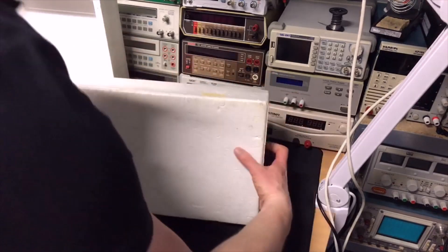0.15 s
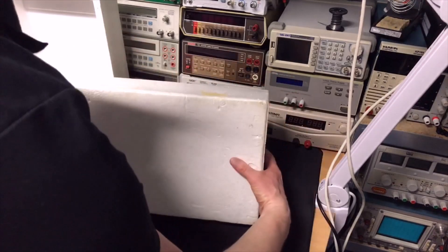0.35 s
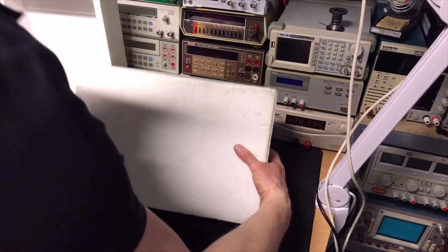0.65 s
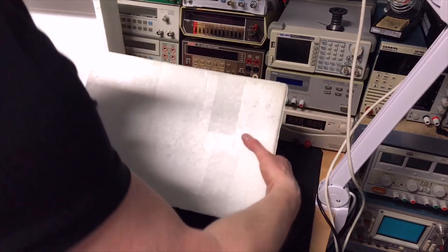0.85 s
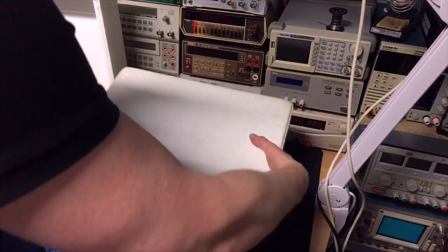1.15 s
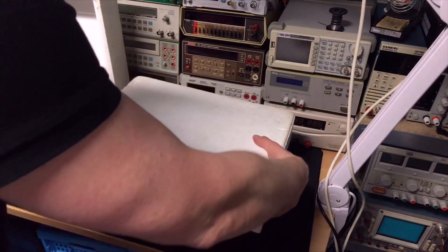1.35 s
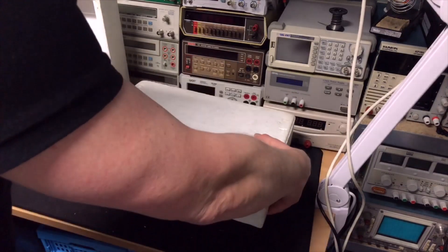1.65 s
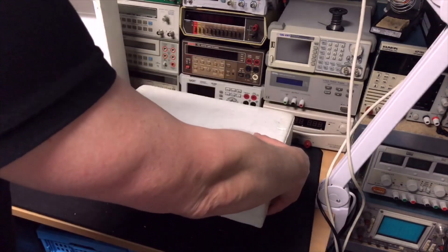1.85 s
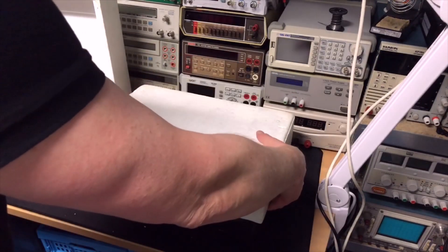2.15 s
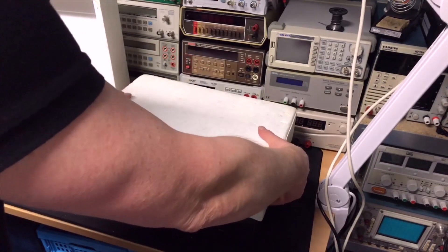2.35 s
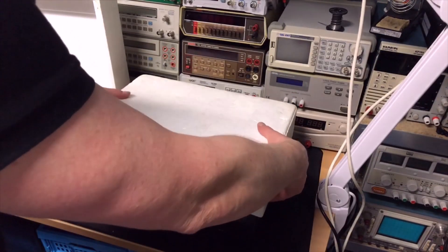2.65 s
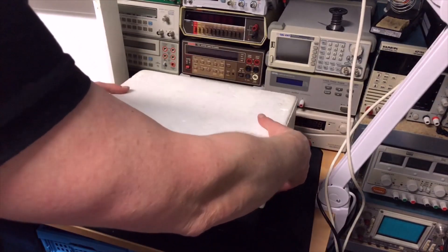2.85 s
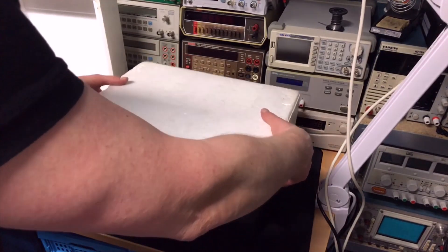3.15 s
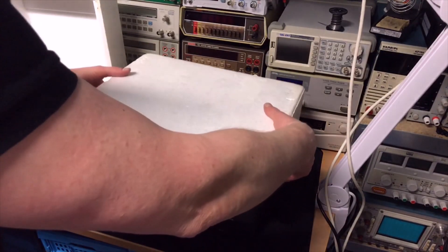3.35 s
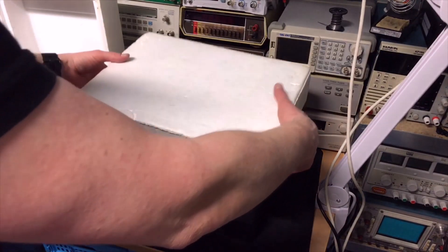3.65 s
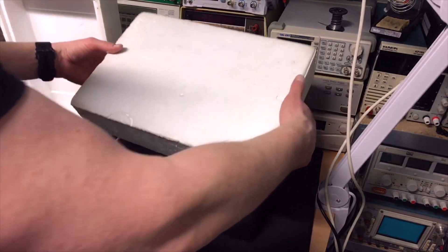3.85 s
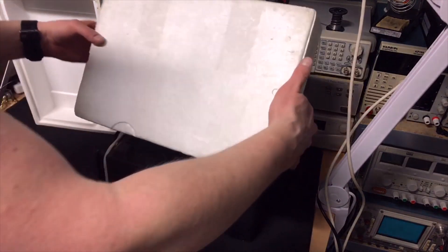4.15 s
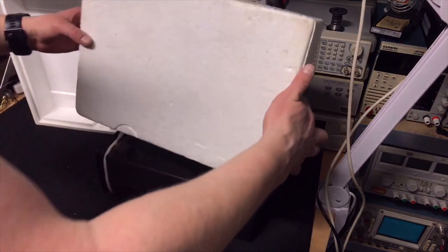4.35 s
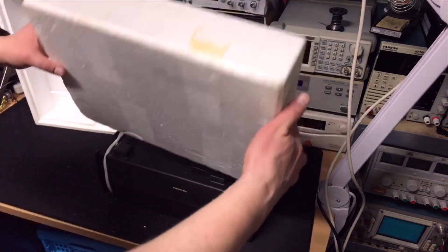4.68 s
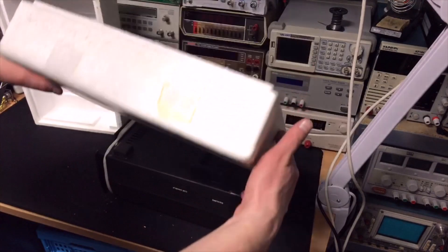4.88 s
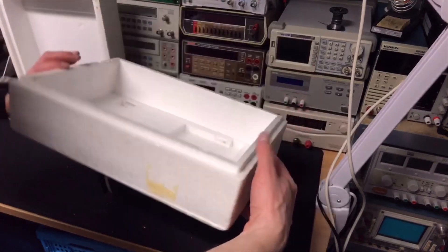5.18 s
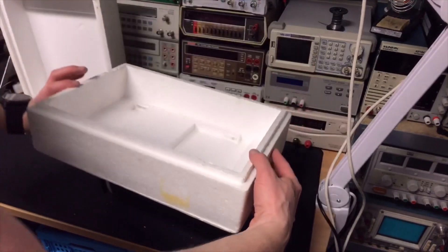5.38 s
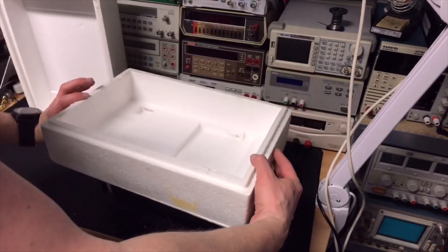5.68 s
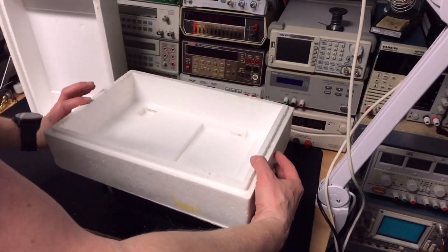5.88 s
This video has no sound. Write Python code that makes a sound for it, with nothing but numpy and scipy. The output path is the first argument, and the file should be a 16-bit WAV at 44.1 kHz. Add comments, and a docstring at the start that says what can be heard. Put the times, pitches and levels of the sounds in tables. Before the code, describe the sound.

Hands work a polystyrene foam shell off an equipment case in a quiet workshop. It opens with a loud burst of scraping and snapping, then scattered taps and soft hollow thumps. A longer run of squeaky rubbing follows as the foam sticks and slips. After a lull come lighter scrapes and squeaks, then a few knocks and a final rub. The microphone is close, with a very faint fan hum behind.

```python
"""Foam shell worked off an instrument case.

Hands loosen a foam packing shell in a quiet workshop, close to a phone. Foam beads stick and slip
in dense clicks that ring the shell, and at times squeak or snap. Grips and knocks tap it, its
hollow booms, fingers rustle on it, and a fan hums far off."""
import sys
import numpy as np
from scipy import signal
from scipy.fft import rfft, irfft
from scipy.io import wavfile
from scipy.ndimage import uniform_filter1d, map_coordinates

SR = 44100
rng = np.random.default_rng(int(sys.argv[2]) if len(sys.argv) > 2 else 0)


def file_out(sig):
    """Save sig as 16-bit WAV at sys.argv[1]."""
    # one column per channel
    cols = np.atleast_2d(sig).T
    # limit, then scale
    lim = np.clip(cols, -1, 1)
    pcm = np.round(lim * 32767).astype(np.int16)
    wavfile.write(sys.argv[1], SR, pcm)


N = 265482
TIME_S = np.arange(N) / SR


def undb(db):
    """Decibels to gain."""
    return 10 ** (np.asarray(db) / 20)


def unit_rms(x):
    """Scale to rms 1."""
    return x / np.sqrt(np.mean(x ** 2))


def ring(x, hz, width_hz):
    """One resonance, gain 1 at its centre."""
    return signal.lfilter(*signal.iirpeak(hz, hz / width_hz, fs=SR), x)


def drift(rate_hz):
    """Random levels joined by straight lines, rate_hz of them a second."""
    levels = rng.standard_normal(int(40 * N / SR))
    return np.interp(TIME_S * rate_hz, np.arange(len(levels)), levels)


def bead_slips(rate_hz, spread_db):
    """Beads letting go: dense clicks of very unequal size."""
    chance, size, polarity = rng.random((3, N))
    strength = undb(-spread_db * np.log(size + 1e-9))
    return unit_rms((chance < rate_hz / SR) * strength * (polarity - 0.5))


# Shell modes by group: pitch_hz, base_width_hz, relative_db
LOW_MODES = [(520, 82, 2.5), (565, 48, 3), (706, 76, 2.5), (807.7, 20, 3), (1000, 35, 7), (1160, 310, -2),
             (1284, 99, 8), (1526, 94, 2.5)]
MID_MODES = [(1675, 45, -0.5), (1750, 26, -6.5), (1858, 150, -1), (2100, 31, -1.5), (2237, 66, -2.5),
             (2530, 100, -3.5), (2765, 140, -4.5), (2882, 31, -1.5), (3027, 46, 0), (3214, 64, -6),
             (3430, 160, -8.5)]
EDGE_MODES = [(3800, 52, -10.5), (4240, 130, -2), (4548, 140, 3), (4930, 150, 2.5), (5200, 180, -0.5)]
RIM_MODES = [(5700, 40, 2.8), (5920, 94, 0.62), (6230, 150, 4.9), (6650, 160, 6.8), (7066, 490, 2)]
HOLLOW_MODES = [(169, 120, -2), (238, 30, 4), (303.2, 38, 4), (395, 69, -3.5)]
def shell(modes, drive, wander_db, contact_hz=None, lift_db=0, damping=1, skirt=7):
    """Clicks ring each mode; the moving contact shifts their balance but not their total power."""
    balance = np.array([undb(db + wander_db * drift(13)) for _, _, db in modes])
    if contact_hz is not None:
        octaves_off = np.array([np.log2(hz / contact_hz) for hz, _, _ in modes])
        balance *= undb(lift_db * np.exp(-(octaves_off / 0.1) ** 2))
    widths_hz = damping * np.array(modes)[:, 1]
    balance /= np.sqrt(np.pi / SR * (widths_hz @ balance ** 2))
    out = np.zeros(N)
    for k, (hz, base_width_hz, _) in enumerate(modes):
        mode = ring(drive * balance[k], hz, widths_hz[k])
        out += (-1) ** k * ring(mode, hz, min(skirt * base_width_hz, hz))  # steepens the skirts
    return out


# Rubbing strokes: start_s, rise_s, hold_s, fall_s, mid_db, low_re_mid_db, edge_re_mid_db,
# rim_re_mid_db, hollow_re_mid_db, mid_contact_hz, edge_contact_hz
STROKES = [(0.0, 0.00082, 0.0013, 0.054, -21.5, 2, -13.5, -15, 2, 2210, 4600),
           (0.04, 0.018, 0.012, 0.075, -29, -1, -15.5, -13.5, -9, 2160, 4420),
           (0.107, 0.048, 0.0059, 0.049, -31.5, 0, -9, -10, 1, 2340, 4700),
           (0.164, 0.039, 0.035, 0.15, -38, 0, -18, -6, -6, 1990, 5060),
           (0.262, 0.013, 0.0069, 0.042, -36, 0.5, -9.5, -11, -5.5, 2490, 4720),
           (0.338, 0.033, 0.074, 0.018, -41.5, -1, -8.5, -8, -13.5, 2107, 4730),
           (0.722, 0.01, 0.011, 0.021, -59.5, 11.5, -4, -16, 12, 2120, 4500),
           (0.826, 0.0014, 0.005, 0.038, -43.5, -9, -1, -1, -40, 1900, 4420),
           (0.928, 0.015, 0.083, 0.043, -68.5, -1.5, -9, -12, 13.5, 2070, 4600),
           (1.02, 0.0079, 0.3, 0.022, -69.5, -4, -6, -21, 3, 2180, 4560),
           (1.201, 0.015, 0.0034, 0.066, -38.5, -13.5, -19, -11, -8.5, 2480, 4430),
           (1.443, 0.0097, 0.0032, 0.021, -46.5, 0, -25, -27, -1.5, 2070, 4480),
           (1.539, 0.044, 0.0047, 0.014, -44.5, -9.5, -8.5, -20, -15.5, 2100, 4180),
           (1.609, 0.033, 0.074, 0.033, -59, -26, -10, -18, -14, 3350, 4670),
           (1.69, 0.11, 0.073, 0.044, -46, -21, 2, -10, -22, 2960, 4270),
           (1.89, 0.064, 0.0083, 0.037, -41.5, -8, -8, -15, -38, 2450, 4460),
           (1.952, 0.045, 0.0058, 0.053, -32.5, 0, -2, -4, -12, 2660, 4880),
           (2.003, 0.036, 0.044, 0.022, -40.5, -13, -14, -12, -22.5, 2560, 5200),
           (2.081, 0.028, 0.009, 0.019, -57, -8, -5, -25, -0.5, 2410, 5200),
           (2.176, 0.038, 0.01, 0.025, -45.5, -18, -6, -5.5, -12, 1810, 5000),
           (2.245, 0.0078, 0.051, 0.028, -42.5, -14, -1, -4, -9.5, 2330, 4520),
           (2.274, 0.049, 0.038, 0.049, -35, 0, -14.5, -9, -6, 2170, 4700),
           (2.454, 0.045, 0.042, 0.027, -52.5, -9.5, -17, -11.5, -13.5, 2960, 4580),
           (2.518, 0.038, 0.052, 0.022, -49, -22, -16, -9, -8.5, 2616, 4910),
           (2.642, 0.022, 0.033, 0.14, -59, -25, -8, -6.5, -26, 3270, 4600),
           (2.909, 0.057, 0.014, 0.024, -59, 4.5, 6, 6.5, -8.5, 2200, 4760),
           (2.979, 0.03, 0.006, 0.038, -48, -3.5, 2.5, 1, -21, 1940, 5120),
           (3.13, 0.082, 0.0025, 0.018, -43.5, -0.5, -2.5, -7.5, -13, 1795, 4930),
           (3.849, 0.053, 0.0027, 0.034, -55.5, -14.5, -24.5, -25, -29, 2010, 4460),
           (4.179, 0.016, 0.007, 0.034, -54, -22, -28, -30.5, -16, 2320, 5150),
           (4.206, 0.076, 0.076, 0.067, -43.5, -8, -12, -16, -22.5, 3250, 4930),
           (4.414, 0.018, 0.13, 0.13, -51.5, -7.5, -28, -27, -13.5, 2780, 5070),
           (4.584, 0.039, 0.064, 0.053, -48.5, -2.5, -11, -19.5, -29, 2940, 5000),
           (4.654, 0.047, 0.11, 0.034, -51.5, -12, -7.5, -7, -28, 1900, 5000),
           (4.777, 0.028, 0.092, 0.015, -53.5, -6, -6.5, -4, -23.5, 2280, 4580),
           (4.996, 0.016, 0.077, 0.038, -62, -29, -13, -18.5, -38, 2530, 4830),
           (5.108, 0.033, 0.091, 0.035, -61, -32, -25, -32, -53.5, 2866, 4590),
           (5.178, 0.042, 0.02, 0.05, -50.5, -1, -7.5, -12, -43, 2860, 4420),
           (5.709, 0.0094, 0.044, 0.04, -61, -10, -8, -21.5, 10, 2130, 4550),
           (5.836, 0.0073, 0.013, 0.042, -57.5, 7, -11, -4, 3.5, 2700, 4800),
           (5.846, 0.026, 0.057, 0.52, -48, -1.5, -7.5, -11, -19, 2800, 4700)]
def rubbing():
    """Strokes scrape the shell; edge and rim answer to finer beads."""
    columns = np.transpose(STROKES)
    start_s, rise_s, hold_s, _, mid_db = columns[:5]
    low_db, edge_db, rim_db, hollow_db, mid_hz, edge_hz = columns[5:]
    coarse, fine = bead_slips(4500, spread_db=2.3), bead_slips(9000, spread_db=2.0)
    judder = undb(1.2 * drift(35))

    def pressure(offset_db, ramp_db=25.5):
        """Each stroke rises, holds and falls; silence between."""
        gain = np.zeros(N)
        for stroke, top_db in zip(STROKES, mid_db + offset_db):
            corners_s = np.cumsum(np.maximum(stroke[:4], (0, 0.001, 0.001, 0.001)))
            shape_db = np.interp(TIME_S, corners_s, (-ramp_db, 0, 0, -ramp_db), left=-200, right=-200)
            gain += undb(top_db + shape_db)
        return uniform_filter1d(gain, size=200)

    # The contact slides from the top of one stroke to the next.
    tops_s = start_s + rise_s + hold_s / 2
    order = np.argsort(tops_s)
    mid_contact_hz = np.interp(TIME_S, tops_s[order], mid_hz[order])
    edge_contact_hz = np.interp(TIME_S, tops_s[order], edge_hz[order])
    mid = shell(MID_MODES, coarse * judder * pressure(0), wander_db=4.4,
                contact_hz=mid_contact_hz, lift_db=6, damping=1.3)
    low = shell(LOW_MODES, coarse * judder * pressure(low_db), wander_db=6.1,
                contact_hz=0.42 * mid_contact_hz, lift_db=3.5)
    edge = shell(EDGE_MODES, fine * judder * pressure(edge_db), wander_db=7.9,
                 contact_hz=edge_contact_hz, lift_db=9, damping=0.93)
    rim = shell(RIM_MODES, fine * judder * pressure(rim_db), wander_db=6)
    hollow = shell(HOLLOW_MODES, coarse * pressure(hollow_db), wander_db=0.73, skirt=10)
    return mid + low + edge + rim + hollow


def flex(x, depth_s=0.0004):
    """Hands flex the shell: a slowly changing lag glides its modes up and down."""
    lag_samples = depth_s * SR * uniform_filter1d(drift(12), size=2000)
    return map_coordinates(x, [np.arange(N) - lag_samples], mode="mirror")


# Taps and sudden slips: start_s, mid_db, low_re_mid_db, edge_re_mid_db, rim_re_mid_db,
# mid_contact_hz, low_contact_hz, base_decay_s
TAPS = [(0.0381, -25, 6, -5, -17, 1810, 1160, 0.11), (0.138, -36.5, 14, -17, -27, 1680, 1080, 0.3),
        (0.207, -22.5, -25, -9, -42, 1615, 1380, 0.074), (0.2237, -38.5, 6, -18, -7, 1930, 1300, 0.11),
        (0.481, -41.5, 7, -18, -36, 2500, 1050, 0.04), (0.515, -28.5, 2, -10.5, -15.5, 2250, 1280, 0.28),
        (0.54, -34.5, 1, 0, -6.5, 1750, 1400, 0.091), (0.654, -40.5, 14, -6, -19, 1830, 910, 0.17),
        (0.916, -30.5, 0.5, -18, -39, 1680, 1450, 0.14), (0.935, -41.5, 1, -12, -25, 2180, 1340, 0.15),
        (1.0334, -29, 3, -26, -25.5, 1770, 1223, 0.15), (1.205, -32, -5, -24, -11.5, 2050, 1520, 0.067),
        (1.277, -32.5, 4.5, -17.5, -23, 2120, 774, 0.18), (1.392, -53, 2, -6.5, -22, 3100, 806, 0.21),
        (1.515, -76, 22, -3, -13, 1590, 910, 0.34), (1.866, -26.5, -1, -19, -12.5, 1820, 1217, 0.18),
        (1.94, -32, -2.5, -24, -24, 2530, 810, 0.071), (2.183, -47.5, -0.5, -23, -27, 1770, 1270, 1),
        (2.314, -29.5, 8, -4, -21, 3080, 835, 0.053), (2.831, -40.5, 8.5, -12, -19.5, 1560, 500, 0.25),
        (2.851, -64, 3, 7, 20, 3320, 1300, 0.13), (3.186, -41, -11, 2, -5, 2720, 1290, 0.083),
        (3.206, -49, 6.5, -8, -14, 1750, 990, 0.18), (3.65, -68, -2.5, -2.5, -14.5, 1760, 725, 0.38),
        (3.726, -71, 8, 2, -14.5, 3200, 790, 0.11), (3.932, -37, -5, -11.5, -20.5, 2260, 1030, 0.21),
        (3.985, -45, 1, -27, -28, 1580, 1045, 0.2), (4.06, -41, -0.5, -15, -12, 3210, 1360, 0.16),
        (4.187, -46, 0.5, -31, -26, 2120, 715, 0.18), (4.906, -40, -4.5, -14, -34, 2460, 999, 0.095),
        (5.203, -48.5, -5, -30, -24, 3430, 1010, 0.2), (5.346, -43, 0, 4, -0.5, 1580, 783, 0.012),
        (5.353, -56, -2.5, 3, -4, 2123, 803, 0.065), (5.53, -50.5, 6.5, -18, -25, 2690, 510, 0.18),
        (5.591, -61.5, -17, -16, -34, 2460, 850, 0.42), (5.66, -38, 3.5, -3, -15, 1630, 510, 0.12),
        (5.681, -39.5, 10.5, -6, -23.5, 1770, 684, 0.16), (5.838, -46.5, 9, -2.5, -23, 2660, 1050, 0.14)]
def taps():
    """The shell struck while the hands damp it: a crack, then a dry crunch."""
    starts_s, mid_db, low_db, edge_db, rim_db, mid_hz, low_hz, decays_s = np.transpose(TAPS)
    latest = np.maximum(np.searchsorted(starts_s, TIME_S) - 1, 0)
    beads = bead_slips(9000, spread_db=1.8)

    def shower(offset_db, decay_scale, crack_db=-3.5, crack_s=0.0023, choke_age=0.55):
        """Each tap sets off slips that die away until the hands still them."""
        gain, t = np.zeros(N + SR), np.arange(SR // 2) / SR
        attack = 1 - np.exp(-t / 0.0018)
        crack = undb(crack_db) * np.exp(-t / crack_s)
        for start_s, db, base_decay_s in zip(starts_s, mid_db + offset_db, decays_s):
            start = int(start_s * SR)
            age = t / (decay_scale * base_decay_s)
            crunch = np.exp(-np.log(1000) * age - (age / choke_age) ** 4)
            gain[start:start + len(t)] += undb(db) * attack * (crack + crunch)
        return beads * gain[:N]

    mid = shell(MID_MODES, shower(0, decay_scale=0.62), wander_db=6.7,
                contact_hz=mid_hz[latest], lift_db=10, damping=1.9)
    low = shell(LOW_MODES, shower(low_db, decay_scale=0.67), wander_db=4.3,
                contact_hz=low_hz[latest], lift_db=9.5, damping=3.19)
    edge = shell(EDGE_MODES, shower(edge_db, decay_scale=0.86), wander_db=6.5, damping=5.9)
    rim = shell(RIM_MODES, shower(rim_db, decay_scale=0.78), wander_db=2.3, damping=1.5)
    return mid + low + edge + rim


# Pushes on the hollow: start_s, drive_db, others_re_main_mode_db, push_s
BOOMS = [(0.0, -18.5, 5.5, 0.0029), (0.039, -36.5, 26, 0.0088), (0.092, -32.5, 8, 0.0081),
         (0.131, -21.5, 2.5, 0.0097), (0.278, -38, -10, 0.0087), (0.293, -39.5, -15, 0.0075),
         (0.668, -37.5, -1, 0.029), (0.738, -60, 2, 0.0093), (1.274, -31.5, -3.5, 0.028),
         (1.394, -52, -3, 0.0051), (1.633, -43.5, -1.5, 0.015), (1.845, -37.5, -2.5, 0.055),
         (2.226, -43.5, 8, 0.014), (2.286, -37.5, 6, 0.024), (2.315, -27.5, -3.5, 0.014),
         (2.567, -48.5, 6, 0.023), (2.835, -24.5, -13.5, 0.036), (3.939, -60, 6, 0.0029),
         (3.987, -49.5, -5, 0.0051), (4.569, -67, 18, 0.0049), (5.549, -55, 3, 0.027),
         (5.659, -27, 0, 0.01), (5.689, -32.5, 1, 0.0033), (5.714, -36.5, -1, 0.022),
         (5.736, -48.5, -5, 0.0074)]
def booms(trim_db=-7):
    """A soft, shaky push drives the air in the hollow."""
    out, t = np.zeros(N), np.arange(4096) / SR
    shakes = rng.standard_normal((len(BOOMS), len(t)))
    main_hz = HOLLOW_MODES[1][0]
    for hz, width_hz, mode_db in HOLLOW_MODES:
        push = np.zeros(N + len(t))
        for (start_s, drive_db, others_db, push_s), shake in zip(BOOMS, shakes):
            swing = np.sin(2 * np.pi * hz * t) + 3 * shake
            progress = np.clip(t / max(push_s, 0.003), 0, 1)
            swell = np.sin(np.pi * np.sqrt(progress)) / np.tanh(width_hz * push_s)
            tilt_db = others_db / 2 * (-1 if hz == main_hz else 1)
            start = int(start_s * SR)
            push[start:start + len(t)] += undb(drive_db + mode_db + tilt_db + trim_db) * swing * swell
        out += ring(ring(push[:N], hz, width_hz), hz, 6 * width_hz)
    # A small hollow radiates little below its lowest mode.
    return signal.sosfilt(signal.butter(2, 150, "high", fs=SR, output="sos"), out)


# Squeaks: start_s, end_s, first_hz, last_hz, level_db
SQUEAKS = [(0.059, 0.075, 4380, 4350, -35), (0.334, 0.463, 3540, 3460, -60.5),
           (1.667, 1.742, 2940, 2900, -50), (1.681, 1.719, 6740, 6470, -57.5),
           (1.72, 1.805, 4420, 4800, -62), (1.75, 1.811, 2786, 2924, -46), (1.77, 1.879, 2156, 2024, -50),
           (1.765, 1.865, 3850, 4120, -53), (1.788, 1.877, 5700, 5540, -47),
           (1.815, 1.882, 2830, 2880, -40.5), (1.95, 1.994, 4720, 4960, -46),
           (1.96, 2.052, 2870, 2815, -43), (2.03, 2.083, 5250, 5100, -48.5),
           (2.056, 2.101, 1914, 1960, -49), (2.103, 2.134, 780, 775, -51), (2.1, 2.152, 2860, 2770, -56),
           (2.179, 2.256, 1880, 1827, -49.5), (2.185, 2.233, 2780, 2860, -45.5),
           (2.327, 2.397, 1284, 1277, -39.5), (2.305, 2.408, 5680, 5760, -50.5),
           (2.48, 2.546, 3170, 3110, -50.5), (2.5, 2.594, 1690, 1697, -50),
           (2.532, 2.636, 4860, 4770, -54.5), (2.58, 2.607, 1787, 1850, -50.5),
           (2.938, 3.038, 4550, 4700, -54.5), (3.009, 3.033, 797, 786, -49),
           (4.267, 4.375, 688, 715, -56.5), (4.405, 4.607, 724, 726, -60), (4.427, 4.616, 1282, 1310, -75),
           (4.476, 4.532, 5180, 5000, -63.5), (4.679, 4.876, 4900, 5140, -55),
           (4.721, 4.807, 4080, 4140, -56), (4.74, 4.834, 1870, 1807, -50.5),
           (5.014, 5.045, 1530, 1550, -62), (5.023, 5.117, 2634, 2620, -60.5),
           (5.063, 5.182, 1240, 1270, -70), (5.971, 6.011, 4950, 4800, -58), (5.1, 5.207, 3154, 3104, -56),
           (5.197, 5.243, 987, 987, -54), (5.845, 5.966, 4550, 4480, -63), (5.883, 6.016, 729, 700, -58.5),
           (5.844, 5.974, 2760, 2710, -60), (5.92, 6.021, 2780, 2844, -56.5),
           (5.852, 5.962, 1790, 1600, -51), (5.833, 5.896, 970, 1007, -57.5),
           (5.865, 5.946, 1278, 1266, -51.5), (5.968, 6.011, 1698, 1744, -53.5),
           (5.671, 5.679, 3580, 3480, -47.5), (5.658, 5.689, 1812, 1750, -47),
           (2.534, 2.618, 2584, 2710, -48.5), (2.546, 2.603, 3166, 3040, -47),
           (4.607, 4.727, 3020, 2900, -55.5), (4.747, 4.786, 1540, 1590, -56),
           (5.1, 5.189, 2190, 2260, -61.5)]
def squeaks(relative_width=0.014):
    """Slipping locks to one mode: a narrow, wavering tone that glides a little."""
    out = np.zeros(N + SR)
    noises = rng.standard_normal((len(SQUEAKS), 2, SR // 4))
    for (start_s, end_s, first_hz, last_hz, level_db), noise in zip(SQUEAKS, noises):
        start, count = int(start_s * SR), int((end_s - start_s) * SR)
        lowpass = signal.butter(1, relative_width * first_hz / 2, fs=SR)
        waver = signal.lfilter(*lowpass, noise[0] + 1j * noise[1])
        waver /= np.sqrt(np.mean(np.abs(waver) ** 2) / 2)
        pitch_hz = np.linspace(first_hz, last_hz, count)
        tone = np.exp(2j * np.pi * np.cumsum(pitch_hz) / SR)
        swell = signal.windows.tukey(count, 0.5)
        out[start:start + count] += undb(level_db) * swell * (waver[-count:] * tone).real
    return out[:N]


# Bead snaps: peak_s, peak_db, pitch_hz
SNAPS = [(0.0427, -18.5, 1100), (0.072, -24, 1290), (0.103, -22, 2217), (0.2073, -22, 1528),
         (0.2078, -17.5, 2300), (0.2263, -15.5, 2180), (.4868, -37, 1090), (0.5453, -19, 1500),
         (.6585, -27, 610), (.6625, -27, 1070), (.9211, -24, 1310), (1.2825, -35.5, 885),
         (1.4565, -33, 2150), (1.5795, -50, 2110), (1.8739, -21, 1520), (1.9418, -27, 2600),
         (2.3179, -24, 1119), (2.323, -29, 1240), (3.218, -32, 1648), (3.9916, -32.5, 2424),
         (4.292, -31, 2860), (4.321, -32, 2500), (4.802, -40, 2100), (5.3488, -46, 1480),
         (5.53, -45.5, 2610), (5.8396, -35, 2650)]
def snaps(decay_cycles=1.5):
    """A single bead snaps: a few cycles that swell at once and die a little slower."""
    out, t = np.zeros(N + SR), np.arange(-128, 512) / SR
    for (peak_s, peak_db, pitch_hz), phase_turns in zip(SNAPS, rng.random(len(SNAPS))):
        age = t * pitch_hz / decay_cycles
        envelope = np.exp(-np.where(age < 0, (2 * age) ** 2, age))
        tone = np.cos(2 * np.pi * (pitch_hz * t + phase_turns))
        start = int((peak_s + t[0]) * SR)
        out[start:start + len(t)] += undb(peak_db) * envelope * tone
    return out[:N]


# Finger rustle contour: time_s, level_db
GRIP_LEVELS = [(0.449, -54), (.68, -69.5), (1.55, -70), (2.0, -64.5), (2.33, -55.5), (2.44, -69),
               (2.7, -66), (3.83, -86.5), (4.299, -65), (4.42, -82), (4.9, -64), (4.97, -72),
               (5.289, -77.5), (5.799, -76.5), (6.02, -71)]
def grip(bright_db=-10):
    """Skin on beads: a faint rustle, with a brighter part that comes and goes."""
    level_db = np.interp(TIME_S, *np.transpose(GRIP_LEVELS))
    dull = unit_rms(ring(ring(bead_slips(8000, spread_db=1.8), 1300, 3000), 1400, 2600))
    bright = unit_rms(ring(ring(bead_slips(8300, spread_db=1.8), 4100, 5800), 4100, 5800))
    gain = undb(level_db + 2 * drift(16))
    return gain * (dull + undb(bright_db + 1.3 * drift(4.2)) * bright)


def room_tail(x, t60_s=0.025, level_db=-16.5):
    """Short workshop reflections, arriving after 4 ms."""
    t = np.arange(SR // 2) / SR
    tail = rng.standard_normal(len(t)) * np.exp(-np.log(1000) * t / t60_s) * (t > 0.004)
    tail /= np.sqrt(np.sum(tail ** 2))
    return undb(level_db) * signal.fftconvolve(x, tail)[:N]


# Air spectrum: frequency_hz, relative_density_db
AIR_SPECTRUM = [(24, -59.5), (40, -38), (107, -9), (167, -14.5), (203, -6.5), (227, -12.5), (308, -5),
                (375, -12), (448, -8.5), (522, -14.5), (1820, -27), (7600, -35.5), (9880, -62.5),
                (16700, -120)]
def workshop_air(level_db=-72.5):
    """Quiet, dark noise whose level drifts slowly."""
    hz, db = np.transpose(AIR_SPECTRUM)
    bins_hz = np.arange(N // 2 + 1) * SR / N + 1
    spectrum = undb(np.interp(np.log(bins_hz), np.log(hz), db))
    air = irfft(rfft(rng.standard_normal(N)) * spectrum, N)
    return undb(level_db + 2 * drift(1.3)) * unit_rms(air)


# Fan tones: pitch_hz, level_db
FAN_TONES = [(123.8, -103), (199.2, -85), (301.5, -91), (446.8, -96)]
def fan_hum(width_hz=2.2):
    """A far fan: narrow noise bands heard as wavering tones."""
    return sum(undb(db) * unit_rms(ring(rng.standard_normal(N), hz, width_hz)) for hz, db in FAN_TONES)


def scene():
    """Close foam with a short room tail, over air and fan; mono."""
    foam = flex(rubbing()) + taps() + booms() + grip() + squeaks() + snaps()
    return (foam + room_tail(foam) + workshop_air() + fan_hum())[None]


def record(dry, bass_hz=80, asymmetry=0.33, stopband_hz=7950):
    """The phone thins the bass, swings slightly lopsided on loud sounds and cuts the top."""
    thin = signal.sosfilt(signal.butter(2, bass_hz, "high", fs=SR, output="sos"), dry)
    lopsided = thin + asymmetry * thin ** 2
    return signal.sosfilt(signal.cheby2(18, 70, stopband_hz, fs=SR, output="sos"), lopsided)


dry = scene()
out = record(dry)
file_out(out)
```